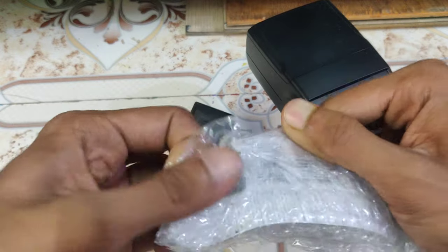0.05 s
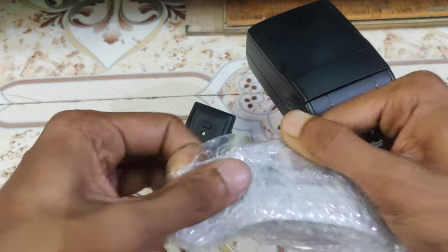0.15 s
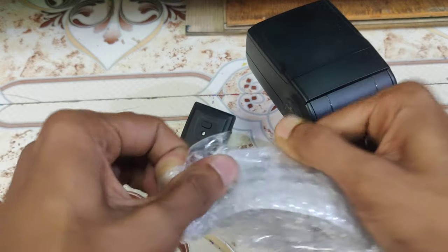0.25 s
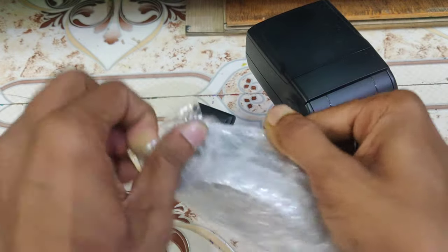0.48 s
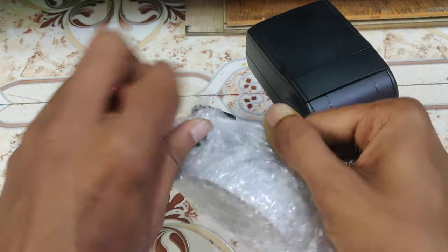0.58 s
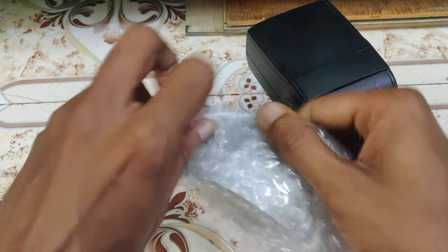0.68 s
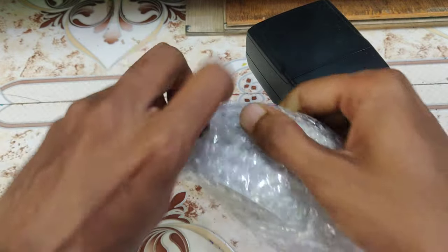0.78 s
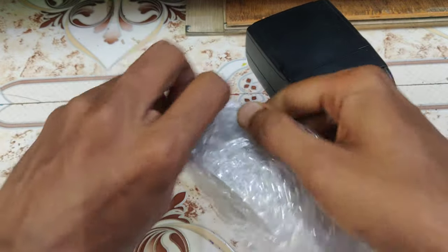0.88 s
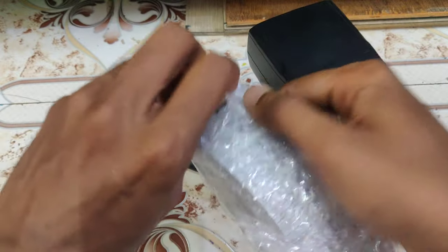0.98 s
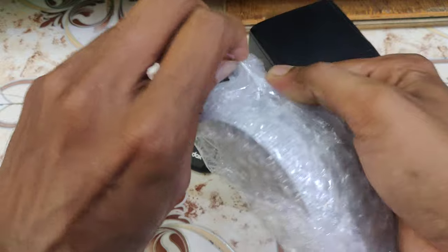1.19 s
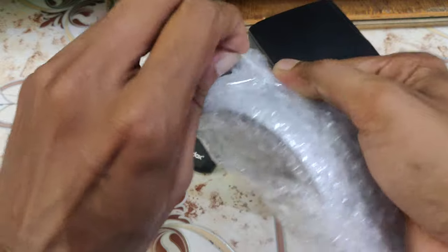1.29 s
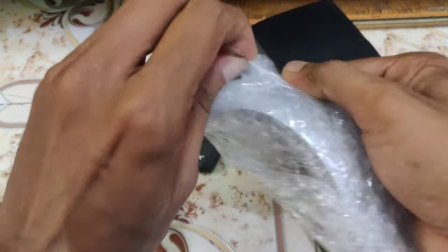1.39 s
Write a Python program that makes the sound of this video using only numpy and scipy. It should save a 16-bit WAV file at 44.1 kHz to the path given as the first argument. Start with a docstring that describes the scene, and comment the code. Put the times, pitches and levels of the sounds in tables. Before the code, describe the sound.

Hands crinkle plastic bubble wrap close by, and a single bubble pops sharply.

```python
"""Bubble wrap pulled and crinkled by hand over a table in a small room, close to a stereo microphone.
From the start, tiny creases tick and film rubs on film over the room's faint hum. The film buckles in
single snaps, crowded through the first second, each ringing briefly in the room. The hands bump the
roll, and just after, at 1.1 s, one bubble bursts sharply. A few more snaps and soft bumps follow,
and the fine crinkling carries on to the end."""
import sys
import numpy as np
from scipy import signal
from scipy.fft import rfft, irfft, next_fast_len
from scipy.io import wavfile

SR = 44100
rng = np.random.default_rng(int(sys.argv[2]) if len(sys.argv) > 2 else 0)


def bounce(signal):
    """Save signal as a 16-bit WAV file at the path given by the first command-line argument."""
    frames = np.transpose(np.atleast_2d(signal))
    limited = np.clip(frames, -1, 1)
    pcm = np.round(limited * 32767).astype(np.int16)
    wavfile.write(sys.argv[1], SR, pcm)


N = 63945
SCATTER_DB = -5  # near echoes of snaps and crinkles off the roll, hands and table


def film_flip(crack_db, tilt_db, pocket_db, pocket_hz, pan_db, flutter, rings, scatter_db, room_db):
    """Film flips with a bright crack over a brief swing of the air pocket; gives (direct, echoes)."""
    # spectrum of the crack: (frequency [Hz], level [dB])
    crack_spectrum = [(150, -11), (500, -11.5), (1000, -8.5), (2200, -1.5), (4000, -2.5), (5500, -1.5),
                      (6500, 2), (7200, 1), (8000, -2.5), (9000, -12.5), (11500, -12.5), (15000, -10.5)]
    pocket_half_octaves, pocket_skirt, low_cut_ratio = 0.77, 2.72, 0.48
    ring_width_hz = 220

    def colour(hz):
        octaves = np.log2(np.maximum(hz, 1000) / 6500)
        crack = amp(crack_db + along(crack_spectrum, hz) + tilt_db * octaves)
        ratio = (hz + 1) / pocket_hz
        skirts = (1 + (np.log2(ratio) / pocket_half_octaves) ** 2) ** (pocket_skirt / 2)
        pocket = amp(pocket_db) / skirts / np.hypot(1, (low_cut_ratio / ratio) ** 2)
        return np.hypot(crack, pocket)

    def taut(hz):  # resonances and hollows of taut film colour only the direct sound
        return amp(sum(db * np.exp(-.5 * ((hz - centre) / ring_width_hz) ** 2) for centre, db in rings))

    direct, echoes = path_to_mic(scatter_db, room_db, pan_db, flutter)
    return convolve(click(lambda hz: taut(hz) * colour(hz)), direct), convolve(click(colour), echoes)


def film_snaps():
    """The pulled film buckles in single flips, each from its own spot in front of the microphone."""
    # snaps: (time [s], crack [dB], crack tilt [dB/octave], air pocket [dB], pocket pitch [Hz],
    # left-right [dB], flutter [share]), then any resonances of taut film: (frequency [Hz], gain [dB])
    snaps = [(.053, -20, 6, -26, 1510, 2, 0.7), (.098, -22.5, 6.5, -34, 1500, 3, .5),
             (.111, -23, -0.5, -19.5, 1900, -2, 0.84), (.168, -20, -0.5, -17, 1940, 11, 0.75),
             (.178, -14.5, 4, -30, 960, 6.5, 0.5), (.2093, -12.5, 4, -13, 1720, 0, 0.77),
             (.2329, -19, 8.5, -16, 900, -3, 0.9), (.2467, -13, 11, -14, 790, 7, .4),
             (.2531, -19.5, 0.5, -16, 895, 14, .5), (.2672, 3.3, -0.3, 4.5, 806, -2, 0.01, (950, 3),
             (1380, -12), (1900, 4), (4350, -7), (5100, 7), (5850, -7), (6500, -5)),
             (.2748, -12.5, 2, -13, 900, -17, 0.6), (.3063, -19, 6, -14, 900, -6, .7),
             (.3164, -16, 0, -28, 1500, 13, .5), (.3269, -14, 6, -28, 1000, -1, .3),
             (.3367, -29, 7, -8.5, 1240, 5, 0.14), (.3513, -19.5, -4, -8, 3600, 5, 0.3, (3700, 5)),
             (.3871, -10.5, 10.5, -5.5, 1330, -4, 0), (.38795, -5.5, -1.5, -4, 1200, 4.5, 0.3, (1850, -4),
             (2750, 4), (3750, -10), (4900, -6)), (.4253, -10.5, -1, -7.5, 1000, 1, 0.85),
             (.4717, -13.5, 0, -34, 1000, -2, 0.65), (.4758, -10.5, 1.5, -27, 2380, -2, 0.54),
             (.5159, -15.5, 5, -16, 1980, -5, 0.55), (.533, -22, -3, -17, 1000, 4, .7),
             (.568, -8.5, -1.8, -1, 920, -1, 0.01, (1900, 6)),
             (.5685, -9.5, 2, -3, 4340, 6, 0.42, (4750, 6), (5800, -8)),
             (.6214, -13, 2.5, -7.5, 950, 3, 0.4), (.634, -21, -4, -12.5, 1270, 3, .85),
             (.645, -27, 12, -10, 1460, 4, 0.1), (.692, -28, 0, -8.5, 1300, 8, 0.45),
             (.6954, -4.5, -1, -27, 2200, 3, .1, (6600, 4)), (.7003, -8.5, 0, -3, 1630, 5, 0.02),
             (.764, -22, 5, -8, 890, 2, 0.38), (.7763, -11, 0.5, -17, 905, 1.5, 0.3),
             (.8068, -6, 3.5, -10, 1830, 0, 0.97), (.8115, -24, 1, -11, 557, -3, 1.1),
             (.8157, -15.5, 3, -8.5, 1420, -6, 1.1), (.822, -23.5, -3, -12, 540, -2, 1.1),
             (.868, -17, -2, -18, 1720, -1, 0.9), (.9443, -10.5, -4.5, 8, 1700, 1.5, 0.01, (1300, 3),
             (3650, 8), (4450, -6)), (.9543, -8, -1, -1.5, 1530, 3, 0.03),
             (.9747, -8.5, 0, 1.3, 1230, 1, 0, (3500, -8)), (1.0162, -28, -5.5, -7, 1560, -6, 0.9),
             (1.0269, -16, -3, -6.8, 1560, 3, 0.4), (1.1953, -14, -4, 1, 1730, 2, 0.03),
             (1.1985, -12.5, -0.5, -5.5, 960, -2, 0.3), (1.2275, -19, 0, -11, 1810, 6, 0.45),
             (1.2875, -19, 5, -28, 1000, -6, 0.5), (1.355, -19, 2.5, -13, 1530, 0, 0.3)]
    out = np.zeros((2, N))
    for start, *snap in snaps:
        direct, echoes = film_flip(*snap[:6], rings=snap[6:], scatter_db=SCATTER_DB, room_db=-7)
        add(out, start, direct + echoes)
    return out


def bubble_burst(start_s=1.11447, bounce_s=.0027, bounce_db=-11):
    """One bubble bursts: its torn skin rings, and the pop bounces off the table top."""
    # resonances of the torn skin: (frequency [Hz], gain [dB])
    skin_rings = [(1900, -2), (3450, 6), (4400, 3)]
    direct, echoes = film_flip(crack_db=10.3, tilt_db=0.8, pocket_db=6, pocket_hz=840, pan_db=-2,
                               flutter=0.1, rings=skin_rings, scatter_db=-4, room_db=-4.5)
    out = np.zeros((2, N))
    add(out, start_s, direct + echoes)
    add(out, start_s + bounce_s, amp(bounce_db) * direct)
    return out


def crinkles(spots=6, ticks_per_s=800, size_spread_db=4.5, tick_db=-6, rub_db=-8):
    """Tiny creases give way at several spots while film rubs on film; both follow the handling."""
    # how hard the hands work the wrap: (time [s], level [dB])
    handling = [(0, -49), (.08, -63.5), (.145, -51.5), (.175, -46), (.23, -48), (.34, -46), (.40, -46),
                (.49, -49), (.55, -47), (.62, -51.5), (.68, -49.5), (.75, -50.5), (.82, -42), (.875, -52.5),
                (.91, -47.5), (1.0, -42.5), (1.08, -46.5), (1.2, -44.5), (1.3, -51.5), (1.39, -52.5),
                (1.45, -46.5)]
    # spectrum of creases and rubbing: (frequency [Hz], level [dB])
    spectrum = [(200, -11), (500, -1.5), (1400, -4), (3000, -2.2), (4800, -3), (6600, 1), (8000, -4.5),
                (9200, -10.5), (12000, -12), (15000, -4)]
    level = amp(np.interp(np.arange(N) / SR, *np.transpose(handling)))
    pulse = click(lambda hz: amp(along(spectrum, hz)))
    pulse /= np.linalg.norm(pulse)
    out = amp(rub_db) * level * coloured_noise(spectrum)
    for _ in range(spots):
        sizes = amp(size_spread_db * np.minimum(rng.exponential(size=N), 3))
        signs = rng.choice([-1, 1], N)
        gives_way = rng.random(N) < ticks_per_s / spots / SR
        ticks = level * unit(sizes * signs * gives_way)
        direct, echoes = path_to_mic(SCATTER_DB, room_db=-5, pan_db=rng.normal(0, 1.5), flutter=0.65)
        tick_at_mic = convolve(pulse, direct + echoes)
        out += amp(tick_db) / np.sqrt(spots) * convolve(ticks, tick_at_mic)[:, :N]
    return out


def hand_bumps(attack_s=0.0016):
    """Each bump of the hands is a dull, quickly damped swing of the roll, heard in the centre."""
    # bumps on the roll: (time [s], level [dB], pitch [Hz], time to fall 60 dB [s])
    bumps = [(.387, -30, 314, 0.019), (.807, -51, 372, 0.032), (0.946, -42, 343, 0.041),
             (1.075, -35, 109.3, 0.14), (1.082, -38, 253, 0.077), (1.194, -32.5, 374, 0.03),
             (1.263, -40, 263, 0.13), (1.276, -33, 185, 0.035)]
    out = np.zeros((2, N))
    t = np.arange(SR // 4) / SR
    for start, db, hz, t60 in bumps:
        envelope = amp(db - 60 * t / t60) * (1 - np.exp(-t / attack_s))
        add(out, start, (envelope * np.sin(2 * np.pi * hz * t))[None])
    return out


def path_to_mic(scatter_db, room_db, pan_db, flutter, flutter_t60_s=.007, scatter_t60_s=0.032):
    """From wrap to microphone: the direct sound with its flutter, and near echoes with the room's tail."""
    right_lag_s = .00005
    flutter_echo_db = 5  # fully fluttering film sends this much more into the room than a clean flip
    n = SR // 2
    t = np.arange(n) / SR
    flutter = np.clip(flutter, 0, 1)
    near = unit(diffuse(n) * amp(-60 * t / scatter_t60_s))
    echoes = (amp(scatter_db) * near + amp(room_db) * room_tail(n)) / np.sqrt(n)
    direct = np.sqrt(flutter / n) * unit(diffuse(n) * amp(-60 * t / flutter_t60_s))
    direct[0, 0] += np.sqrt(1 - flutter)
    direct[1, round(right_lag_s * SR)] += np.sqrt(1 - flutter)
    return direct * amp([[pan_db / 2], [-pan_db / 2]]), amp(flutter_echo_db * flutter) * echoes


def room_tail(n):
    """The small room rings for under half a second, the top treble dying first."""
    # decay of the room: (frequency [Hz], time to fall 60 dB [s])
    t60 = [(200, 0.43), (1500, 0.47), (6500, 0.43), (15000, 0.32)]
    # colour of the room's ring: (frequency [Hz], level [dB])
    colour = [(200, 7.5), (800, -8.5), (1600, -1), (4000, -1.5), (6500, 0.5), (14000, 0)]
    hz, t, bands = signal.stft(diffuse(n), SR, nperseg=256)
    decay = amp(along(colour, hz)[:, None] - 60 * t / along(t60, hz)[:, None])
    _, tail = signal.istft(bands * decay, SR, nperseg=256)
    return unit(tail[:, :n])


def room_tone(floor_db=-53):
    """Mains hum over the room's low rumble and faint hiss."""
    # partials of the hum: (frequency [Hz], level [dB])
    partials = [(100, -50.5), (199.5, -61.5)]
    # spectrum of rumble and hiss: (frequency [Hz], level [dB])
    floor = [(20, -29), (35, -14), (46, -2), (65, -11), (88, -0.5), (106, 1), (130, -3.5), (180, -13.5),
             (240, -8), (330, -18.5), (700, -21), (2000, -33.5), (7000, -29), (15000, -45)]
    t = np.arange(N) / SR
    hum = sum(amp(db) * np.sqrt(2) * np.sin(2 * np.pi * (hz * t + rng.random())) for hz, db in partials)
    return hum + amp(floor_db) * coloured_noise(floor)


def diffuse(n):
    """Stereo noise as a diffuse field reaches the microphone: alike in the bass, unrelated in the treble."""
    # likeness of left and right: (frequency [Hz], correlation [0-1])
    likeness = [(180, 0.87), (550, 0.59), (1650, 0.4), (5000, 0.051), (15000, 0.13)]

    def mid_side_gains(hz):
        angle = np.arccos(np.clip(along(likeness, hz), -1, 1)) / 2
        return np.array([np.cos(angle), np.sin(angle)])

    mid, side = filtered(rng.standard_normal((2, n)), mid_side_gains)
    return np.array([mid + side, mid - side])


def coloured_noise(spectrum):
    """Diffuse noise at unit RMS, shaped by (frequency [Hz], level [dB]) points."""
    return unit(filtered(diffuse(N), lambda hz: amp(along(spectrum, hz))))


def click(gain, size=1024):
    """The shortest causal pulse with this gain over frequency."""
    hz = np.fft.rfftfreq(size, 1 / SR)
    cepstrum = irfft(np.log(np.maximum(gain(hz), 1e-6)))
    cepstrum[1:size // 2] *= 2
    cepstrum[size // 2 + 1:] = 0
    return irfft(np.exp(rfft(cepstrum)))


def amp(db):
    return 10 ** (np.asarray(db) / 20)


def unit(x):
    return x / np.sqrt(np.mean(x ** 2) + 1e-20)


def along(points, hz):
    """Interpolate (frequency [Hz], value) points on a log axis."""
    frequencies, values = np.transpose(points)
    return np.interp(np.log(hz + 1), np.log(frequencies + 1), values)


def filtered(x, response):
    """Apply a gain that depends on frequency."""
    n = x.shape[-1]
    padded = next_fast_len(n + 4096)
    return irfft(rfft(x, padded) * response(np.fft.rfftfreq(padded, 1 / SR)), padded)[..., :n]


def convolve(mono, stereo_response):
    return signal.fftconvolve(mono[None], stereo_response, axes=1)


def add(out, start_s, x):
    """Mix x into out from start_s."""
    i = max(0, round(start_s * SR))
    out[:, i:i + x.shape[1]] += x[:, :N - i]


def scene():
    """The wrap close up, with the small room behind it."""
    return bubble_burst() + room_tone() + crinkles() + hand_bumps() + film_snaps()


def record(dry, overload=.9, top_hz=16000):
    """The microphone's two ports differ in colour, the pop's tip is rounded off, and the top is cut."""
    # sensitivity of the ports: (frequency [Hz], left minus right [dB])
    ports = [(100, 0.5), (1000, 1.8), (3000, 0.1), (6000, 4.5), (8000, -3), (11000, -1.5), (15000, 1)]
    picked_up = filtered(dry, lambda hz: amp(along(ports, hz) * np.array([[.5], [-.5]])))
    rounded = picked_up / (1 + (picked_up / overload) ** 4) ** .25
    return filtered(rounded, lambda hz: 1 / (1 + (hz / top_hz) ** 120))


dry = scene()
out = record(dry)
bounce(out)
```